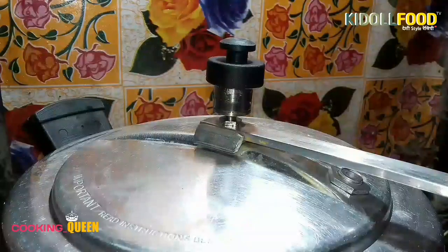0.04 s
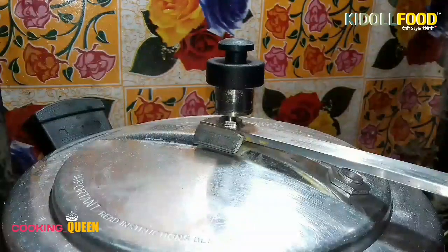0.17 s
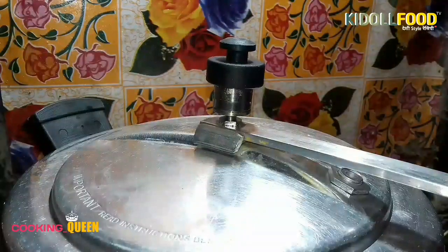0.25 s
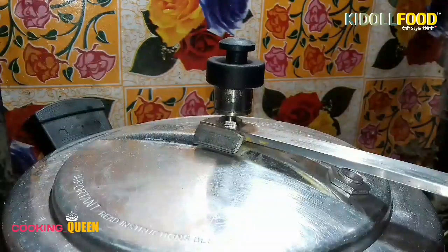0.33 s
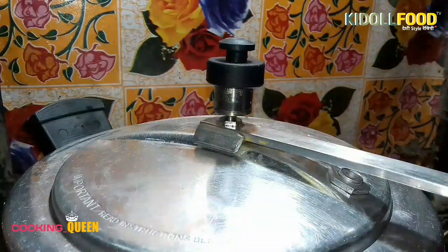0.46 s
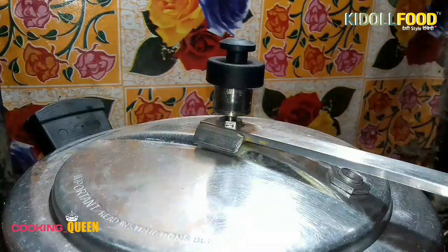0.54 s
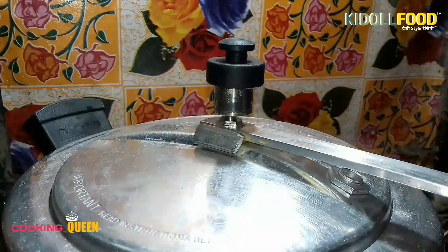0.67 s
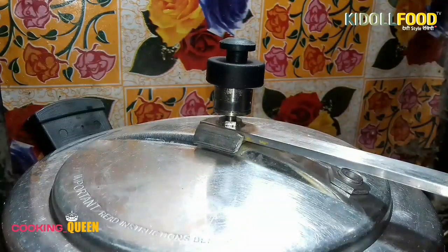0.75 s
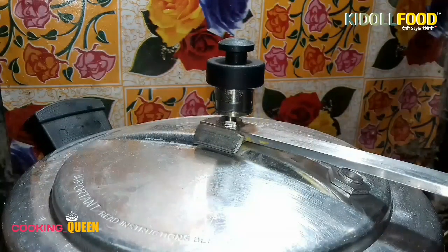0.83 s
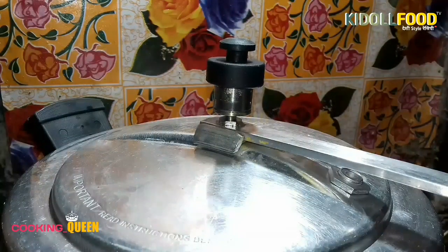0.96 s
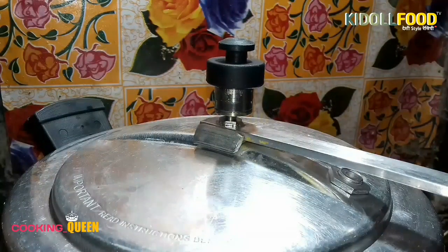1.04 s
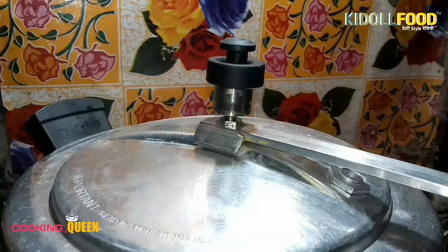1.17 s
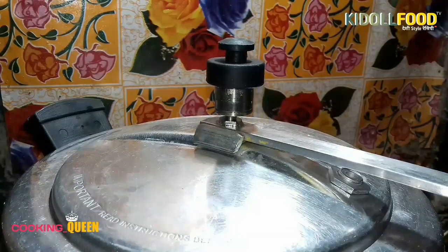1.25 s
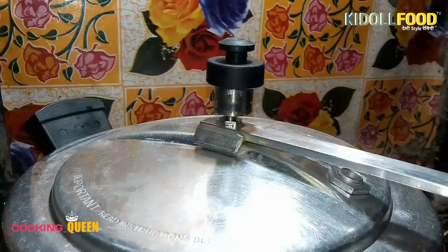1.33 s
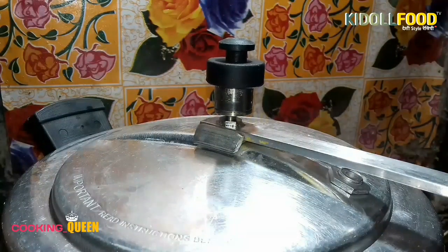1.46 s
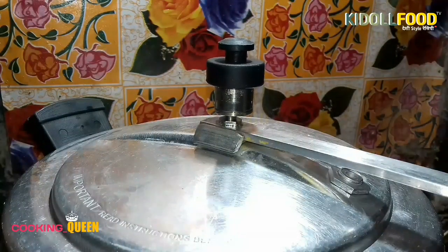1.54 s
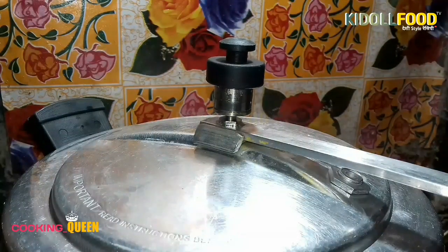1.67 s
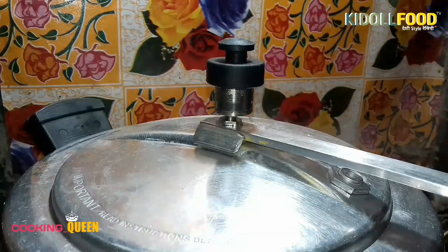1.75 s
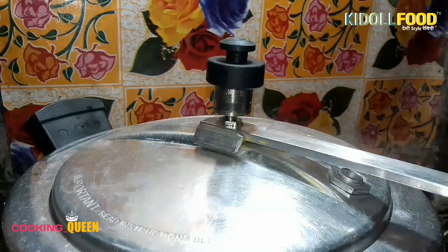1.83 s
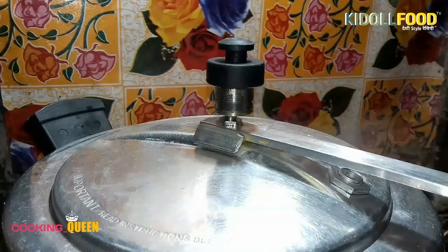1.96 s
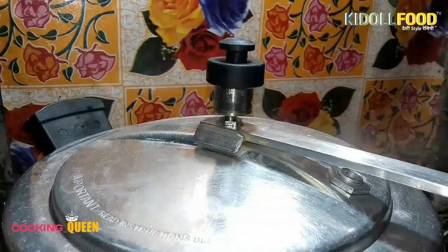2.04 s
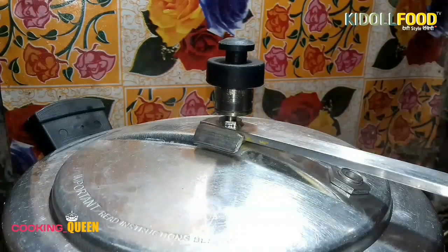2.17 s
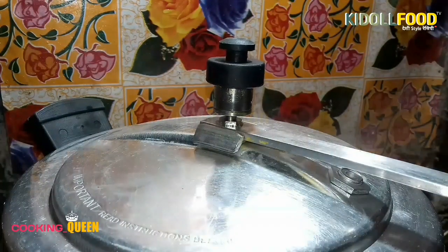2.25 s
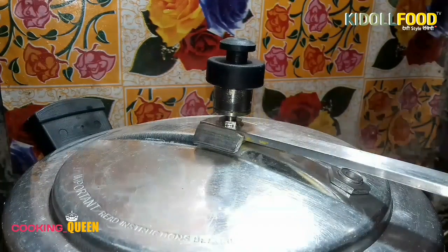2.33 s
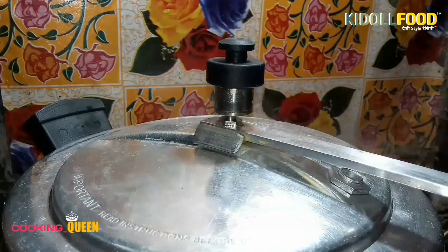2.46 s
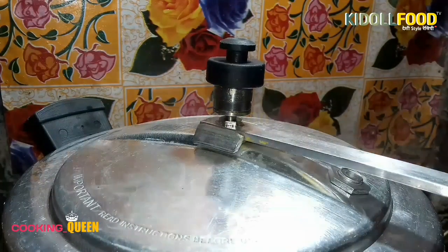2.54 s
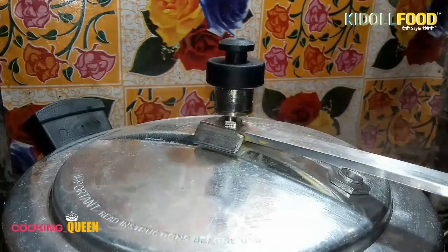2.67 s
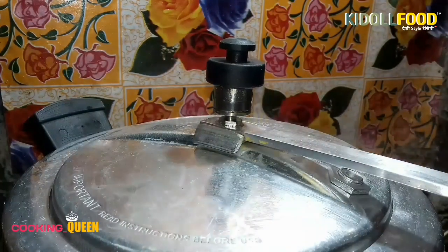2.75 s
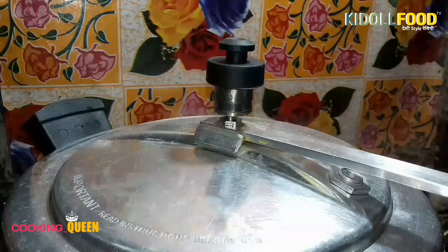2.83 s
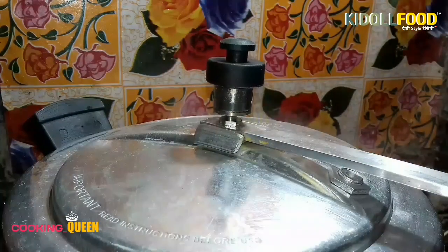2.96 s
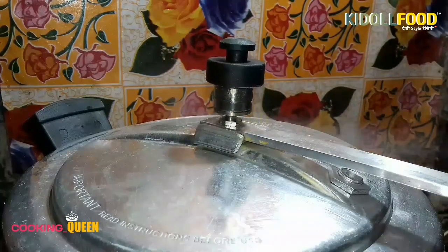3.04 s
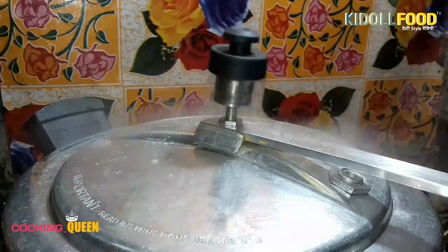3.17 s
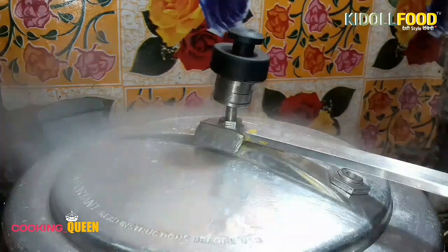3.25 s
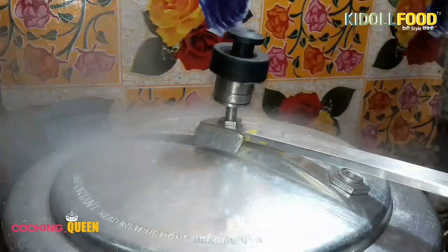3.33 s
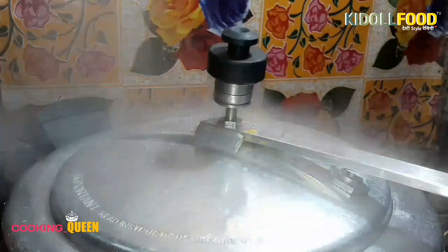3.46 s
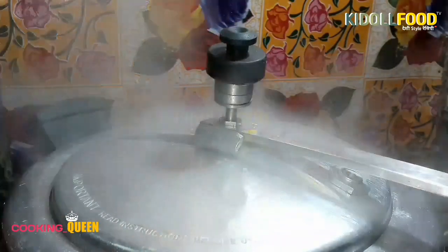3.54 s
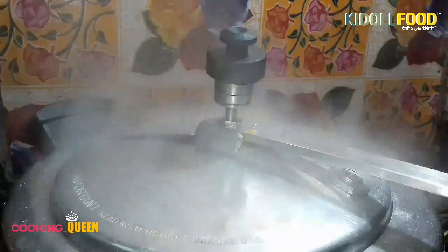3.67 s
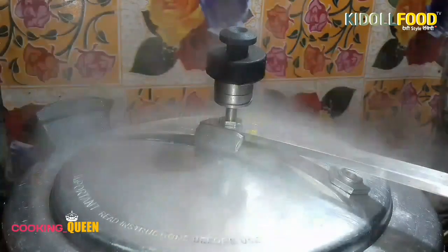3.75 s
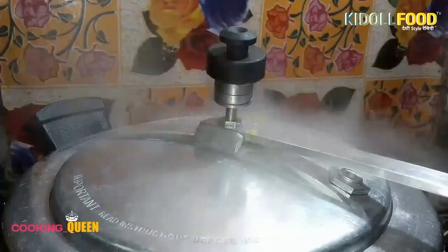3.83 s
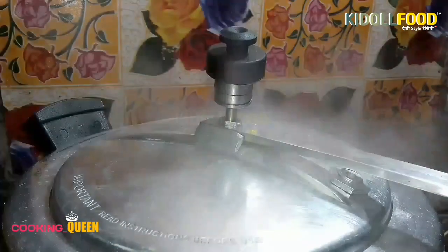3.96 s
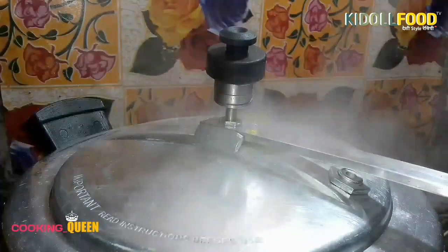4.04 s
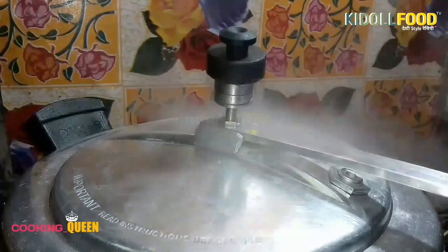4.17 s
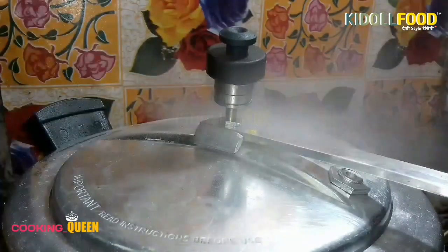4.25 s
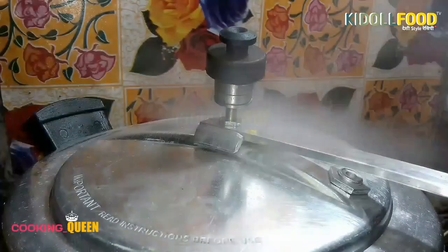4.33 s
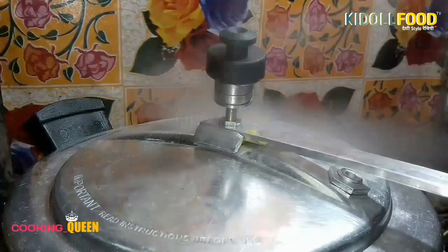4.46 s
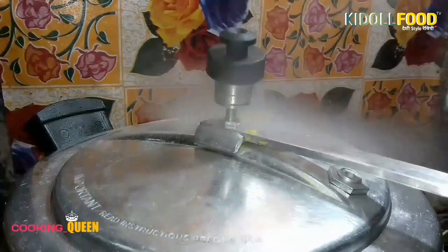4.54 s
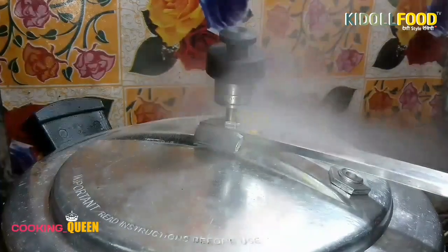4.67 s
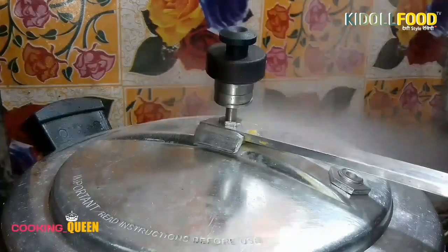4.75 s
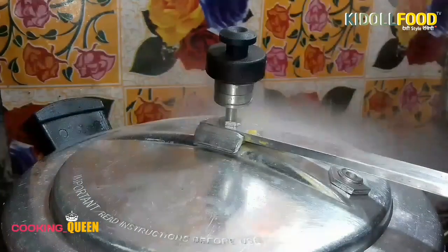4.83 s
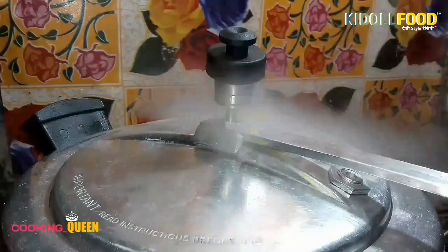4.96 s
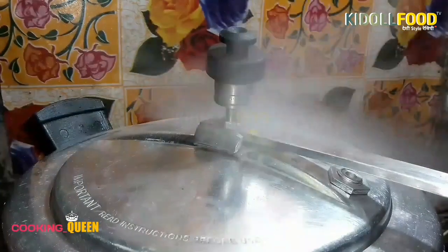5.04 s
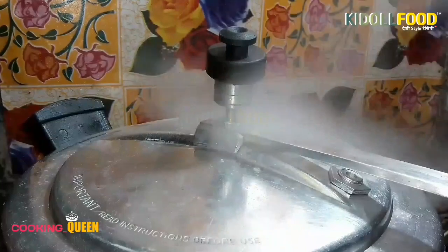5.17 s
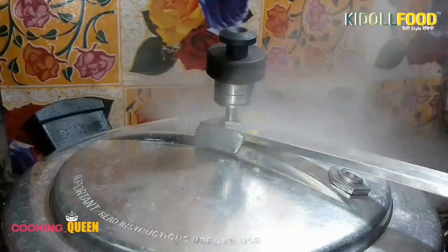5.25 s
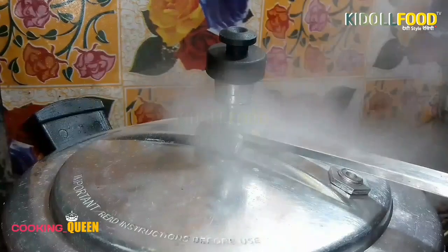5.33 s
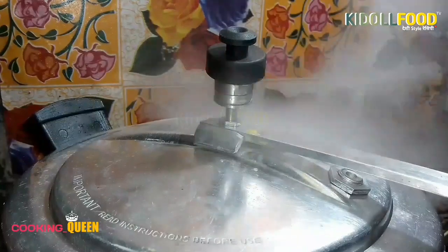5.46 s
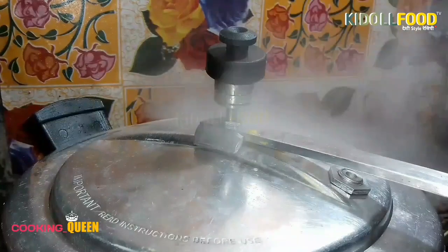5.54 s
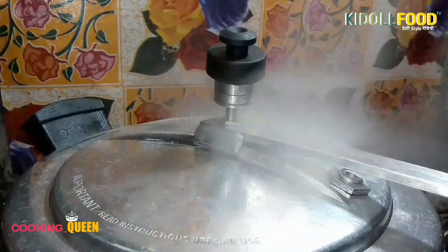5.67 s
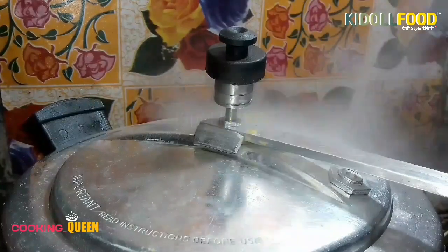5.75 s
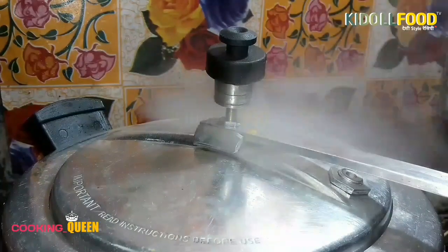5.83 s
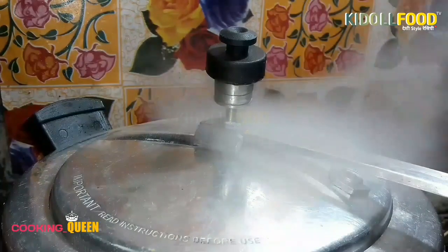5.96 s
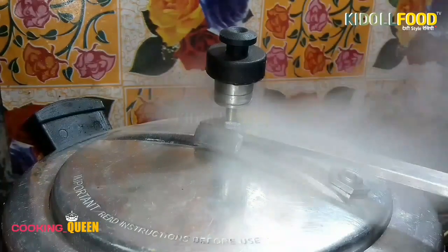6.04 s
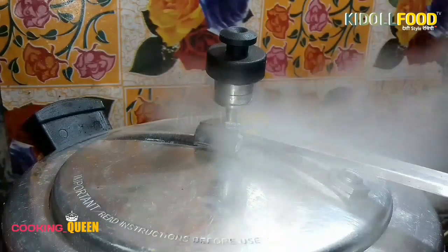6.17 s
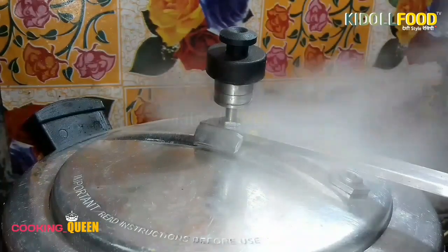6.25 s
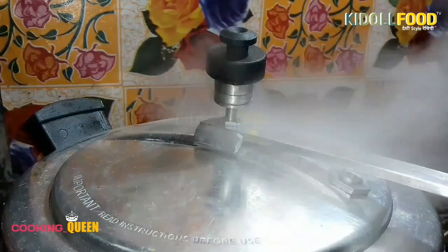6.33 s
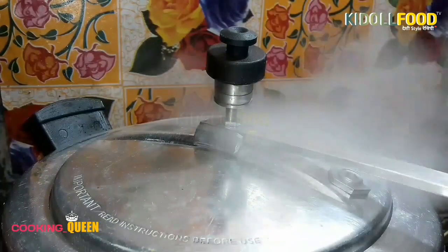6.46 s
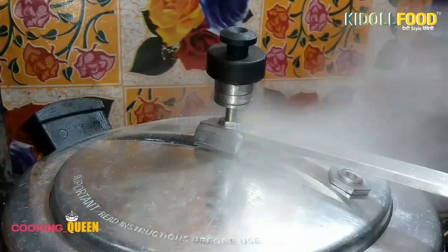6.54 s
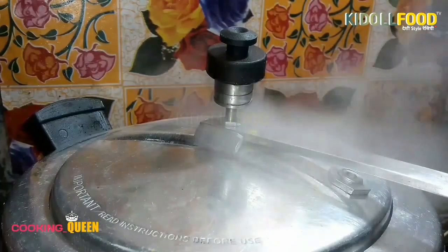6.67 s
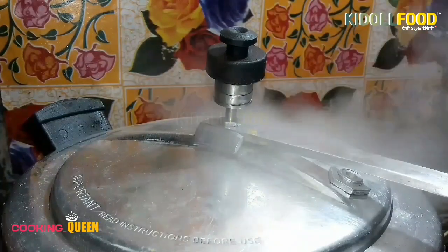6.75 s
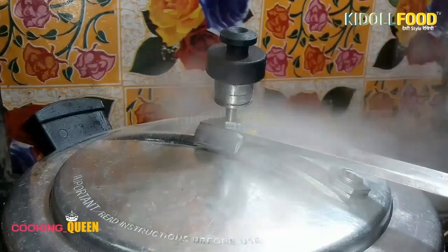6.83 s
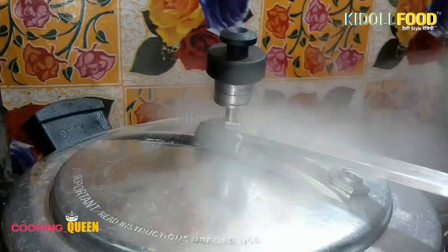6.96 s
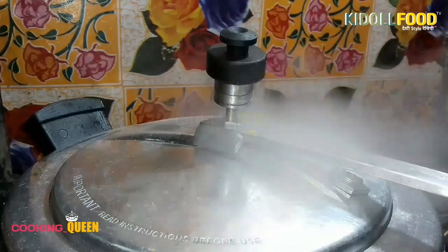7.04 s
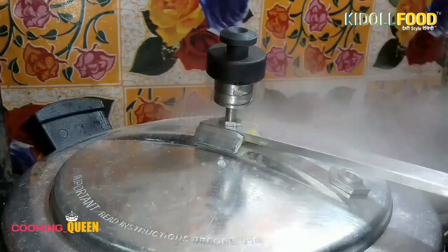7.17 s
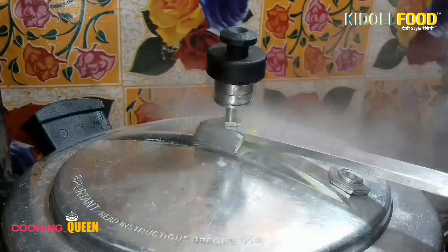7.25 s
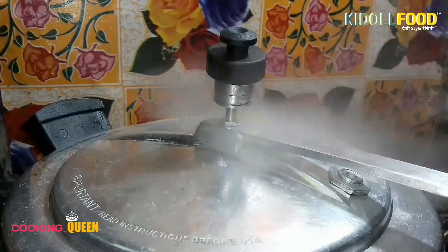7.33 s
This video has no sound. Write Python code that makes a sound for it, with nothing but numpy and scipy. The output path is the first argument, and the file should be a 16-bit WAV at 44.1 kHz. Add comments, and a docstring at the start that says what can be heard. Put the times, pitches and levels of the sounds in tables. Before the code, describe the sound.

A pressure cooker hisses and rattles its weight valve, then vents steam in a loud, whistling, sputtering roar.

```python
"""A pressure cooker on a gas stove, close to a phone. First steam seeps under the weight valve in puffs,
singing in the weight's hollows and squeaking twice, while the weight taps on its seat and rings the lid.
The burner's low drone swells underneath. Just after 3 s the weight lifts and the jet vents to the end:
the hollows sing louder in the hiss, and a broad, sputtering roar, probably the jet overloading each
microphone on its own, covers the bass."""
import sys
import numpy as np
from scipy import signal
from scipy.fft import rfft, irfft, next_fast_len
from scipy.io import wavfile
from scipy.ndimage import uniform_filter1d

SR = 44100
rng = np.random.default_rng(int(sys.argv[2]) if len(sys.argv) > 2 else 0)


def waveform_to_disk(signal):
    """Save audio, clipped to [-1, 1], as 16-bit WAV at the path in sys.argv[1]."""
    frames = np.transpose(np.atleast_2d(signal))
    scaled = np.clip(frames, -1, 1) * 32767
    samples = np.round(scaled).astype(np.int16)
    wavfile.write(sys.argv[1], SR, samples)


N = 326340
TIME = np.arange(N) / SR

# Levels are relative: each layer adds its own trim.
# drone of the gas flame: (time [s], level [dB])
BURNER_FADER = [(0.0, -70), (0.6, -65), (1.34, -59.5), (2.13, -50), (2.46, -52), (2.98, -48), (3.15, -57),
                (3.3, -61)]
# the weight hits its seat: (time [s], blow [dB], treble boost [dB], bass boost [dB])
WEIGHT_TAPS = [(0.214, -33, 9, -8), (0.267, -29, 10, -9), (0.487, -28, -3, -11), (0.666, -29, 6, -11),
               (0.756, -31, 4, -14), (2.628, -28, -11, -2), (2.652, -12.5, 13, -1), (2.689, -27, 0, 9),
               (2.985, -26, 10, -14)]
# ring of the lid: (pitch [Hz], level [dB], time to fall 60 dB [s])
LID_RING = [(252, -4, 0.056), (388, -0.5, 0.1), (494, -4, 0.066), (660, 5, 0.045), (745, 5, 0.077),
            (905, 1, 0.037), (1190, -12, 0.037), (1400, -17, 0.038), (1920, -11, 0.029),
            (2280, -4.5, 0.035), (2610, -3.5, 0.032), (3220, -7, .03)]
# squeaks of the leak: (start [s], length [s], pitch [Hz], level [dB])
LEAK_SQUEAKS = [(.255, 0.049, 2060, -40), (0.643, 0.036, 5000, -30)]

# flow through the leak, as bright hiss and as dull hiss: (time [s], level [dB])
BRIGHT_FADER = [(0.0, -52), (0.08, -25.5), (0.12, -23), (0.42, -22.5), (0.85, -23), (1.15, -26),
                (1.32, -24), (1.7, -24), (1.8, -22.5), (1.96, -22.5), (1.99, -24), (2.58, -25.5),
                (2.72, -22.5), (2.88, -24), (3.08, -22.5), (3.2, -23), (3.45, -28)]
DULL_FADER = [(0.0, -62.5), (0.15, -40), (0.44, -38), (0.84, -37.5), (1.0, -41), (1.41, -40), (2.5, -40),
              (3.02, -40.5), (3.32, -32)]
# tone of those two hisses: (frequency [Hz], gain [dB])
BRIGHT_EQ = [(2350, -26), (4000, -11.5), (4460, -21), (4970, -10.5), (5530, -2.5), (6830, -9.5), (8010, -1),
             (10700, -4), (11900, -13), (15600, -16)]
DULL_EQ = [(18, -56), (30, -31), (95, -24), (133, -7), (269, -32), (390, -9.5), (988, -8.5), (1070, -4.5),
           (1950, -2), (2780, -4.5), (4200, -4.5), (5460, -28), (9240, -120)]
# hollows of the seated weight: (pitch [Hz], filter width [Hz], level [dB])
SEATED_HOLLOWS = [(4360, 100, -9), (4620, 220, -11.5), (5050, 150, -12), (5420, 200, -6), (5700, 120, -3),
                  (6170, 200, -2), (6350, 130, -3), (6590, 150, -1), (6880, 250, -1), (7100, 150, -4),
                  (7290, 110, -3), (7470, 130, -5), (7640, 140, -2), (8380, 200, -5), (8700, 250, -7),
                  (9000, 180, -8), (9250, 120, -8), (9480, 200, -8), (10680, 320, -10), (11300, 90, -14),
                  (12750, 400, -20)]
# the rocking weight chokes the leak: (time [s], dip [dB], length [s])
LEAK_CHOKES = [(0.265, 6.5, 0.043), (0.49, 7.5, 0.056), (0.635, 4, 0.088), (0.76, 5.5, .04),
               (0.905, 4.5, 0.042), (1.845, 3.5, .03), (2.5, 3, .02), (2.99, 3.5, .03)]
# notch in the hiss as the weight starts to rise: (time [s], share removed [dB], centre [Hz])
NOTCH_SWEEP = [(2.25, -12, 10800), (2.4, -2, 10250), (2.5, -2, 9850), (2.65, -3, 9300), (2.8, -6, 8900),
               (2.95, -12, 8500)]
# treble band that spreads in stereo: (low edge [Hz], high edge [Hz])
STEREO_BAND = [5700, 9700]

# the whole roar, and its bass, strong in the first rush of steam: (time [s], level [dB])
ROAR_FADER = [(3.12, -69), (3.2, -64), (3.24, -34), (3.27, -27), (3.35, -19), (3.53, -19.5), (3.77, -18.5),
              (3.81, -21.5), (3.97, -20), (4.05, -22.5), (4.6, -20.5), (4.75, -21.5), (4.85, -18.5),
              (5.02, -20.5), (5.67, -21.5), (6.1, -21), (6.66, -22), (7.0, -23.5), (7.17, -23.5),
              (7.25, -21), (7.4, -24)]
BASS_RUSH = [(3.22, -26), (3.27, -7.5), (3.4, -12.5), (4.0, -7.5), (4.59, -11), (4.62, -20.5), (7.4, -21)]
# tone of the roar: (frequency [Hz], gain [dB])
ROAR_EQ = [(15, -55), (25, -18), (110, -8), (423, -5), (616, -3), (1310, -2.5), (1460, -1.5), (1620, -3),
           (2640, -3), (5030, -5.5), (9870, -7), (14400, -11.5), (15600, -8.5)]
# swells of a throaty band in the roar: (time [s], peak [dB], length [s])
THROAT_SWELLS = [(3.9, -36, .25), (4.85, -40, 0.99), (6.082, -34, 0.19), (6.465, -36, .07),
                 (6.654, -31, 0.078)]
# the roar ducks, or spurts where the dip is negative: (time [s], dip [dB], length [s])
ROAR_DROPOUTS = [(3.38, 3.5, .02), (3.485, 6, 0.072), (5.915, 2, 0.055), (6.245, 1, .015),
                 (6.355, 6.5, 0.028), (6.53, 3, 0.048), (6.725, 3, .015), (6.76, 2, .04), (6.912, -4, .015),
                 (6.93, 3, 0.0084), (6.98, 2, .02), (7.298, 0, 0.011), (7.315, 6, .02), (7.355, 3, .015)]
# fast sputter of the roar: (time [s], depth [dB])
ROAR_SPUTTER = [(3.5, 2.2), (3.7, 1), (5.7, 1.4), (6.3, 2.3), (7.4, 2.6)]

# whistle of the open jet: (time [s], level [dB])
WHISTLE_FADER = [(3.1, -22), (3.22, -26.5), (3.3, -19), (3.85, -20.5), (4.15, -18.5), (4.4, -19.5),
                 (5.1, -18.5), (5.76, -18.5), (6.02, -18.5), (6.86, -17.5), (7.4, -18)]
# hollows of the lifted weight: (pitch [Hz], filter width [Hz], level [dB])
LIFTED_HOLLOWS = [(4360, 160, -14), (4630, 200, -12), (5110, 90, -9), (5240, 70, -9), (5380, 110, -10),
                  (5515, 100, -5), (5710, 70, -3), (5860, 120, -6), (6100, 120, -10), (6240, 110, -3),
                  (6350, 120, 0), (6540, 70, -10), (6750, 140, -4), (6980, 220, -2.5), (7340, 180, -5.5),
                  (7650, 150, -13), (7880, 220, -9), (8120, 100, -9), (8540, 220, -12), (8950, 200, -16),
                  (9600, 180, -13)]
# surges of the whistle: (time [s], boost [dB], length [s])
WHISTLE_SURGES = [(3.243, 12, .025), (3.33, 2, 0.037), (3.63, 2.5, .06), (3.775, 2.5, 0.044),
                  (4.74, 2, .04), (7.02, 0, .05), (7.33, 2, .04)]


def undb(db):
    return 10 ** (np.asarray(db) / 20)


def unit(x):
    return x / np.sqrt(np.mean(x ** 2))


def ramp(points):
    """Straight lines through (time [s], value) points."""
    return np.interp(TIME, *np.transpose(points))


def fader(points, fade_s=.03):
    """Gain through (time [s], level [dB]) points, fading to silence outside them."""
    times, db = np.transpose(points)
    return undb(np.interp(TIME, [times[0] - fade_s, *times, times[-1] + fade_s], [-120, *db, -120]))


def bumps(rows):
    """Sum of bell-shaped bumps: (time [s], height, length [s])."""
    return sum(height * np.exp(-(2 * (TIME - at) / length) ** 2) for at, height, length in rows)


def wobble(rate_hz):
    """Smooth random modulation with an RMS of 1."""
    hold = int(SR / rate_hz)
    steps = np.repeat(rng.standard_normal(N // hold + 1), hold)
    return unit(uniform_filter1d(uniform_filter1d(steps, hold), hold)[:N])


def equalise(x, points):
    """Shape x by (frequency [Hz], gain [dB]) points, then bring it to an RMS of 1."""
    hz, db = np.transpose(points)
    size = next_fast_len(N)
    bin_hz = np.maximum(np.arange(size // 2 + 1) * SR / size, 1)
    gain = undb(np.interp(np.log(bin_hz), np.log(hz), db))
    return unit(irfft(rfft(x, size) * gain, size)[..., :N])


def pass_filter(x, kind, hz, order=2):
    return signal.sosfilt(signal.butter(order, hz, kind, fs=SR, output="sos"), x)


def ringing_noise(hz, width_hz):
    """White noise sent twice through one resonance."""
    b, a = signal.iirpeak(hz, hz / width_hz, SR)
    return signal.lfilter(b, a, signal.lfilter(b, a, rng.standard_normal(N)))


def pan_right(db):
    return undb(np.array([[-db], [db]]) / 2)


def widen(x, spread_db, lean):
    """A band of the treble hiss spreads in stereo and leans slightly right."""
    spread = undb(spread_db) * np.roll(x, int(.04 * SR))  # the delay decorrelates left and right
    band = signal.butter(8, STEREO_BAND, "band", fs=SR, output="sos")
    side = signal.sosfiltfilt(band, spread - lean * x)
    return np.array([x + side, x - side])


def burner():
    """The bed: a gas flame droning unsteadily in a narrow low band."""
    return fader(BURNER_FADER) * undb(3.7 * wobble(6.3)) * unit(ringing_noise(138, width_hz=30))


def weight_taps():
    """Each tap rings the lid; a hard blow brings out the high modes, a broad one the lowest."""
    out, t = np.zeros(N), np.arange(SR // 5) / SR
    attack = 1 - np.exp(-t / .0058)
    for at, blow_db, treble_db, bass_db in WEIGHT_TAPS:
        ring = 0
        for hz, db, t60 in LID_RING:
            mode_db = db + rng.normal(0, 1.5) + treble_db * (hz > 1000) + bass_db * (hz < 500)
            ring += undb(mode_db) * np.sin(2 * np.pi * hz * t) * 1000. ** (-t / t60)
        start = int(at * SR)
        out[start:start + len(t)] += undb(blow_db - 4.5) * attack * ring
    return out


def squeaks():
    """The leak squeaks in short, nearly pure tones."""
    out = np.zeros(N)
    for at, length, hz, db in LEAK_SQUEAKS:
        start, t = int(at * SR), np.arange(int(length * SR)) / SR
        arch = np.sin(np.pi * t / length)
        out[start:start + len(t)] += undb(db + 6) * arch * np.sin(2 * np.pi * hz * t)
    return out


def hollows(modes, flicker_db, swell_db):
    """Turbulence rings each hollow on its own, flickering fast and swelling slowly."""
    out = 0
    for hz, width_hz, db in modes:
        ring = ringing_noise(hz, 1.01 * width_hz)
        out += undb(db + flicker_db * wobble(11) + swell_db * wobble(2.56)) * ring
    return unit(out)


def seep(puff_decay_s=.024):
    """Steam slips under the seated weight: singing, bright hiss over a dull one that puffs at each tap."""
    air = equalise(rng.standard_normal(N), BRIGHT_EQ)
    dull = equalise(rng.standard_normal(N), DULL_EQ) * undb(3 + 1.2 * wobble(35))
    bright = undb(5) * hollows(SEATED_HOLLOWS, flicker_db=1.23, swell_db=1.2) + undb(2.5) * air
    choke_db = bumps(LEAK_CHOKES)
    flow_db = wobble(15) - choke_db
    bright += (undb(-.28 * choke_db) - 1) * pass_filter(bright, "high", 10500)  # chokes reshape the top
    puffs = sum(undb(blow_db - 18) * (TIME > at) * np.exp(-np.abs(TIME - at) / puff_decay_s)
                for at, blow_db, *_ in WEIGHT_TAPS)
    dull_gain = fader(DULL_FADER) * undb(.82 * flow_db) + puffs
    return fader(BRIGHT_FADER) * undb(flow_db) * bright + dull_gain * dull


def falling_notch(hiss):
    """A narrow gap glides down through the hiss as the weight starts to rise."""
    depth = fader([(at, db) for at, db, _ in NOTCH_SWEEP])
    centre_hz = ramp([(at, hz) for at, _, hz in NOTCH_SWEEP])
    carrier = np.exp(2j * np.pi * np.cumsum(centre_hz) / SR)
    band = signal.filtfilt(*signal.butter(1, 130, fs=SR), hiss / carrier)
    return hiss - 2 * depth * np.real(band * carrier)


def roar(common_share=.27):
    """Wide, crackly noise, probably microphone overload; it sputters most at its start and near the end."""
    bass_gain = undb(ramp(BASS_RUSH) + 14 + 1.5 * wobble(9))
    crackle = rng.standard_normal((3, N)) * undb(3 * np.minimum(rng.exponential(size=(3, N)), 6))
    centre, sides = crackle[0], crackle[1:]
    noise = equalise(np.sqrt(common_share) * centre + np.sqrt(1 - common_share) * sides, ROAR_EQ)
    bass = pass_filter(noise, "low", 450, order=1)
    treble = pass_filter(noise, "high", 6000)
    throat = unit(signal.lfilter(*signal.iirpeak(1600, 1600 / 350, SR), noise))
    throat_gain = bumps([(at, undb(db), length) for at, db, length in THROAT_SWELLS])
    spits = wobble(300)
    # the roar sputters in brief dips rather than peaks
    sputter = np.minimum(unit(spits - uniform_filter1d(spits, SR // 40)), 1)
    side_flutter_db = .94 * np.array([wobble(70), wobble(70)])
    drop_db = bumps(ROAR_DROPOUTS)
    body_gain = undb(ramp(ROAR_SPUTTER) * sputter + side_flutter_db - drop_db)
    body = pan_right(db=2.8) * body_gain * (noise - treble + (bass_gain - 1) * bass)
    top_gain = undb(2.5 - .74 * drop_db + .87 * sputter)  # the treble follows only part of a dropout
    top = pan_right(db=.8) * top_gain * treble
    return fader(ROAR_FADER) * undb(6) * (body + top) + throat_gain * throat


def jet_whistle():
    """The open jet makes the lifted weight sing in stronger, lower hollows."""
    flow_db = bumps(WHISTLE_SURGES) + .22 * wobble(12)
    song = hollows(LIFTED_HOLLOWS, flicker_db=1.27, swell_db=.73)
    return fader(WHISTLE_FADER) * undb(1.94 + flow_db) * song


def scene():
    """The stereo mix: the seeping cooker hands over to the open jet."""
    seeping = falling_notch(seep()) + squeaks() + weight_taps() + burner()
    whistle = widen(jet_whistle(), spread_db=-36, lean=.01)
    return widen(seeping, spread_db=-17.5, lean=.1) + whistle + roar()


def record(dry):
    """The phone rounds the loudest peaks, drops the lowest rumble and cuts the top."""
    rounded = .9 * np.tanh(dry / .9)
    top_cut = signal.ellip(10, .2, 80, 15560, fs=SR, output="sos")
    return signal.sosfilt(top_cut, pass_filter(rounded, "high", 55))


dry = scene()
out = record(dry)
waveform_to_disk(out)
```